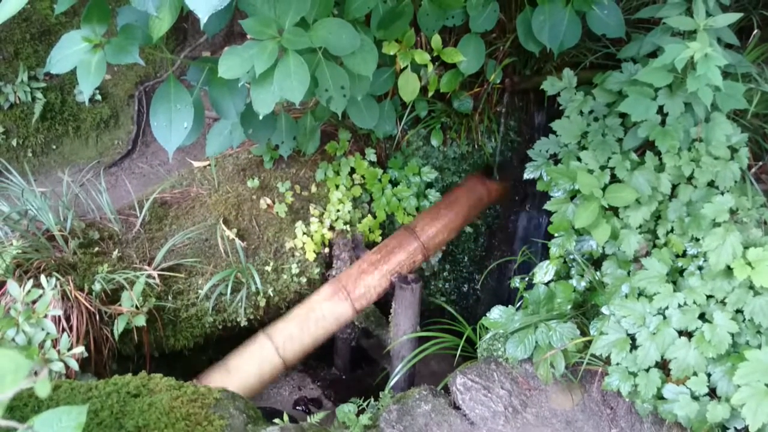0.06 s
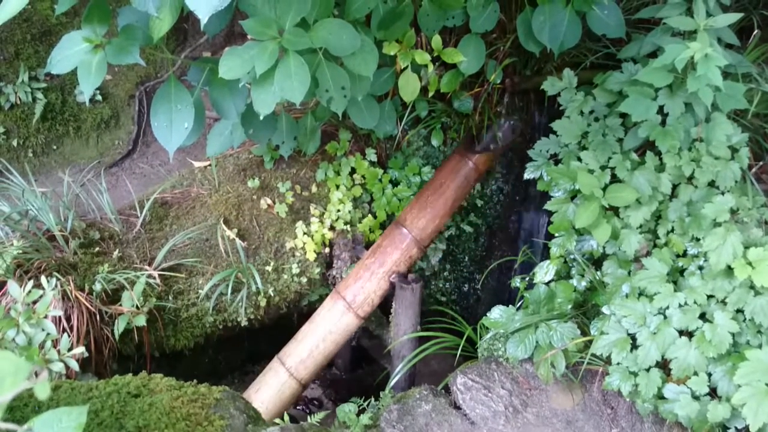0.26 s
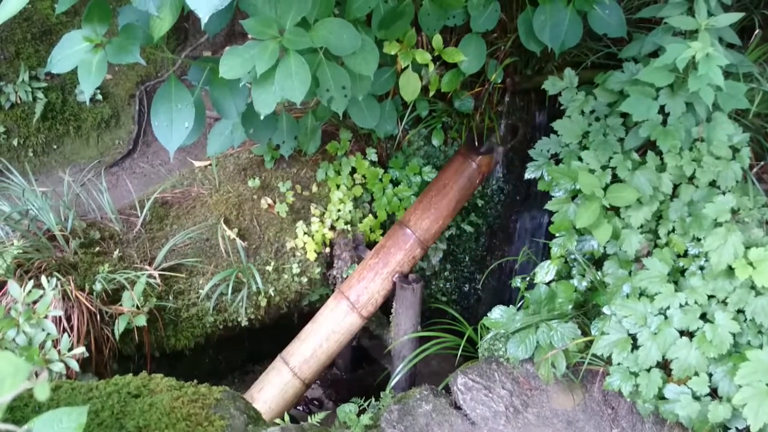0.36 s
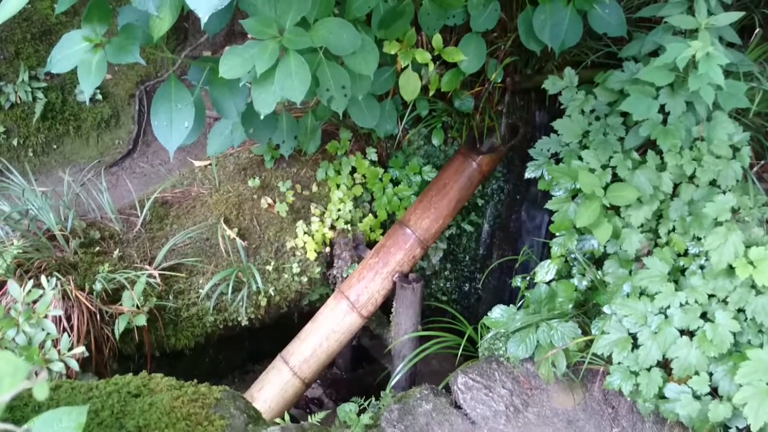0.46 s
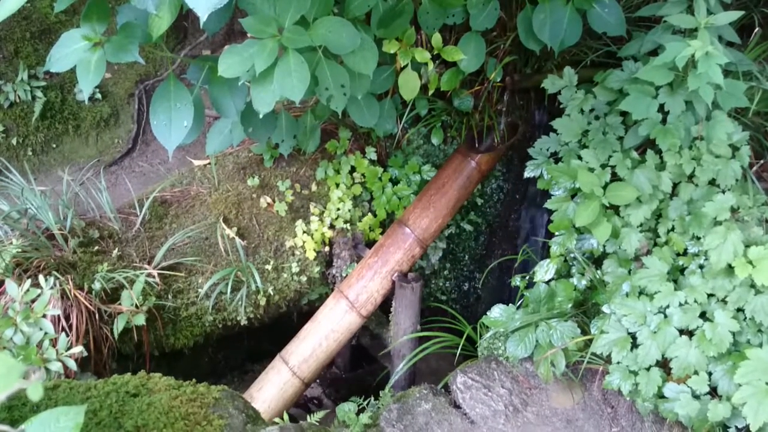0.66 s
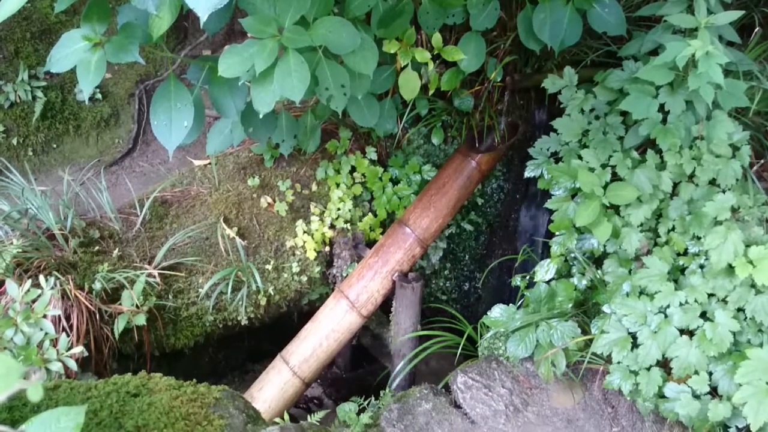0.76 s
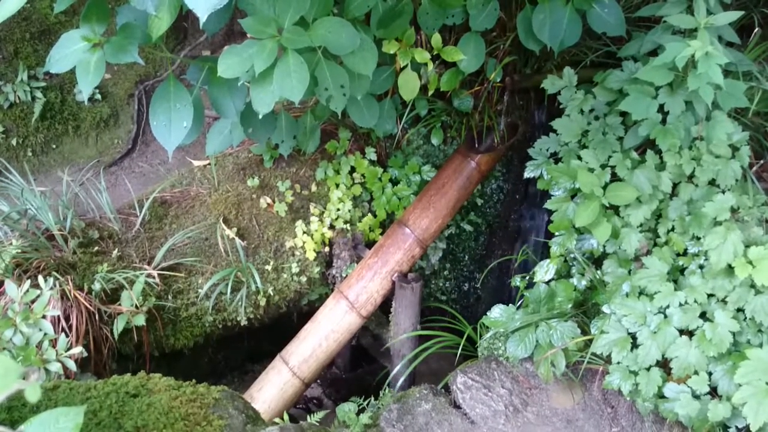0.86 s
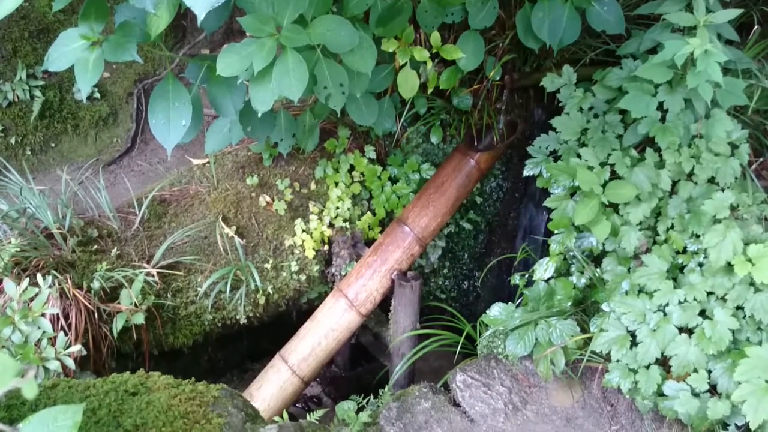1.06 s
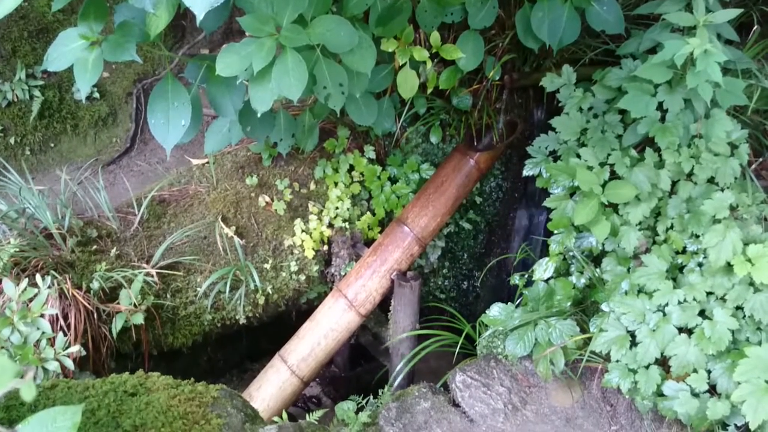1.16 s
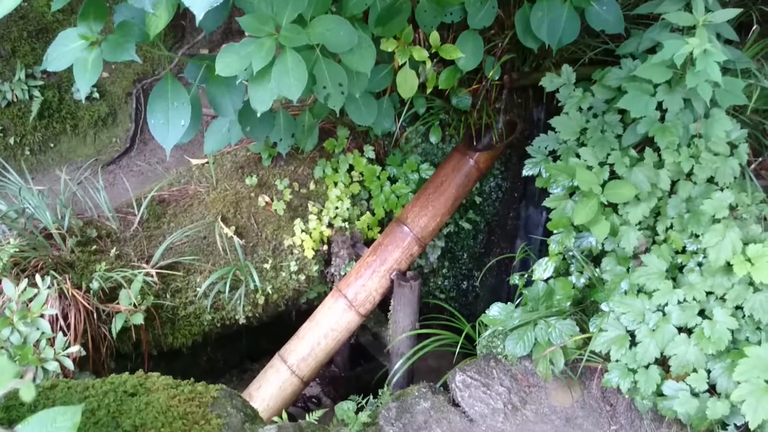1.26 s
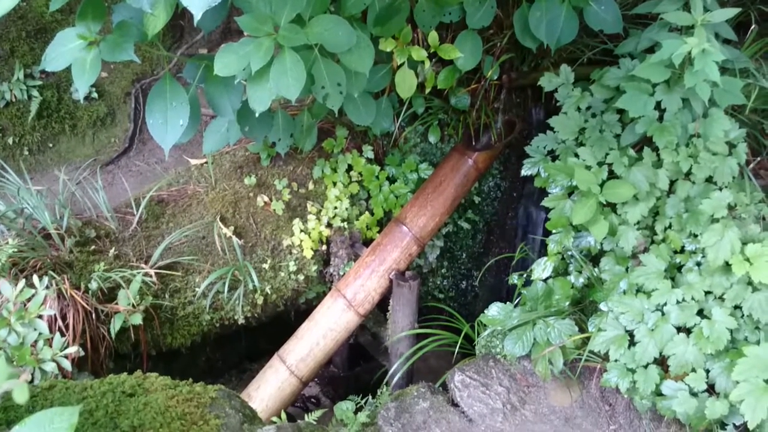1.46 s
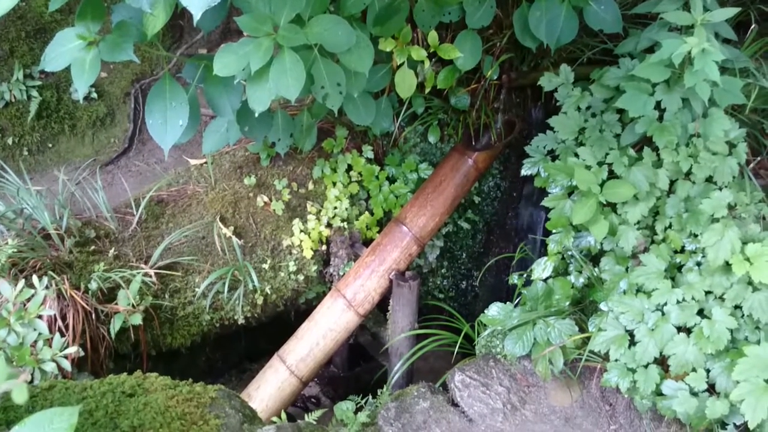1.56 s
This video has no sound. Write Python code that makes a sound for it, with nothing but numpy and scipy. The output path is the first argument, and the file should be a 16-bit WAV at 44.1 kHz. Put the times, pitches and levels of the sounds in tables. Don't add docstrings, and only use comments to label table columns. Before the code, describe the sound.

A hollow bamboo tube knocks loudly on stone, then clacks softly as thin water trickles behind

```python
import sys
import numpy as np
from scipy import signal
from scipy.fft import rfft, irfft
from scipy.io import wavfile
from scipy.ndimage import uniform_filter1d

SR = 44100
rng = np.random.default_rng(int(sys.argv[2]) if len(sys.argv) > 2 else 0)


def wrap_up_sound(samples):
    columns = np.atleast_2d(samples).T
    tamed = np.clip(columns, -1, 1)
    steps = np.round(tamed * 32767).astype(np.int16)
    wavfile.write(sys.argv[1], SR, steps)


def gain_from_db(level_db):
    decades = np.asarray(level_db, float) / 20
    return 10 ** decades


N = 70560


def evened(x):
    return x / np.sqrt(np.mean(x ** 2) + 1e-20)


def read(points, hz):
    f, value = np.transpose(points)
    return np.interp(np.log(hz + 1), np.log(f + 1), value)


def add(mix, start_s, sound):
    part = mix[..., round(start_s * SR):][..., :sound.shape[-1]]
    part += sound[..., :part.shape[-1]]


def colour(x, points):
    gain = gain_from_db(read(points, np.fft.rfftfreq(x.shape[-1], 1 / SR)))
    return irfft(rfft(x) * gain, x.shape[-1])


def patchy(shape, bands, frames):
    across = uniform_filter1d(rng.standard_normal(shape), size=bands, axis=0)
    return evened(uniform_filter1d(across, size=frames, axis=1))


# frequency_hz, level_db
PORT_BALANCE = [(200, -0.5), (800, -3), (1400, -9), (2800, -8.5), (4400, -11.5), (6200, 7.5), (8800, 9),
                (13000, -11)]
# frequency_hz, correlation
WATER_LIKENESS = [(60, -0.41), (700, -0.5), (1400, -0.17), (1800, -0.44), (2600, -0.022)]


def ports(pair, likeness=WATER_LIKENESS):
    hz = np.fft.rfftfreq(pair.shape[1], 1 / SR)
    first, second = rfft(pair)
    same = np.clip(read(likeness, hz), -1, 1)
    tilt = gain_from_db(read(PORT_BALANCE, hz))
    left = tilt * (same * first + np.sqrt(1 - same ** 2) * second)
    both = np.array([left, first]) * np.sqrt(2 / (1 + tilt ** 2))
    return irfft(both, pair.shape[1])


def struck(modes, level_db, contact_s):
    hardest = .33
    low_lag_rad, flip_hz, port_s = 2.79, 1420, .0008
    t = np.arange(SR // 2) / SR
    u = np.linspace(0, 1, max(round(contact_s * SR), 8))
    swell = np.sin(np.pi * u ** .6)
    out = np.zeros((2, len(t)))
    for hz, mode_db, t60_s, left_db in modes:
        chatter = evened(uniform_filter1d(rng.standard_normal(2000), size=90))[:len(u)]
        force = swell * np.exp(.5 * chatter + 2j * np.pi * hz * (u - hardest) * contact_s)
        ring = gain_from_db(mode_db - 60 * t / t60_s) * np.exp(2j * np.pi * hz * t)
        ring = signal.fftconvolve(ring, force)[:len(t)] / abs(force).sum()
        lag = low_lag_rad if hz < flip_hz else 2 * np.pi * (hz - flip_hz) * port_s
        left = gain_from_db(left_db) * (ring * np.exp(1j * lag)).imag
        out += np.array([left, ring.imag])
    return gain_from_db(level_db + 3.5) * out


def played(modes, blows):
    out = np.zeros((2, N))
    for start_s, level_db, contact_s in blows:
        add(out, start_s, struck(modes, level_db, contact_s))
    return out


# frequency_hz, level_db, t60_s, left_minus_right_db
TUBE_MODES = [(259, -41.5, 0.52, -7.5), (341, -28.5, 0.22, -5), (554, -26, 0.23, -5),
              (735.4, -3.5, 0.11, -5.5), (858.6, -3.5, 0.064, -21.5), (1027.6, -15, 0.069, -19),
              (1192, -15.5, 0.059, -1), (1266.3, -8.5, 0.08, -6), (1341, -13.5, 0.11, -26),
              (1474, -1.5, 0.045, -13), (1636, -29, 0.24, -18), (1991, -20, .1, -2),
              (2321, -17.5, 0.13, -25), (2600, -19.5, 0.072, -4)]
# start_s, level_db, contact_s
STONE_BLOWS = [
    (.2254, 0, .02),
]
# frequency_hz, level_db, t60_s, left_minus_right_db
END_MODES = [(116, -34.5, 0.097, -2.5), (330, -30, 0.016, -3), (800, -12, 0.012, 2),
             (1106, -18.5, .04, 3.5), (1475, -8.5, 0.018, -8), (2444, -18, 0.05, -12),
             (3032, -23.5, 0.052, 0.5), (4130, -19.5, 0.071, -12.5)]
# start_s, level_db, contact_s
FIRST_TOUCH = [
    (.2254, 0, .0015),
]


def knock():
    return played(TUBE_MODES, STONE_BLOWS) + played(END_MODES, FIRST_TOUCH)


# frequency_hz, level_db
CRACK_COLOUR = [(60, -50), (250, -28), (900, 0.5), (2000, -1), (4200, -8.5), (7000, -7), (10000, -14.5),
                (16000, -24.5)]
# frequency_hz, t60_s
CRACK_DECAY = [(100, 0.12), (1000, 0.11), (2500, 0.14), (4200, 0.12), (6000, 0.072), (14000, 0.043)]
# frequency_hz, correlation
CRACK_LIKENESS = [(300, 0.28), (1300, 0.42), (1750, -0.23), (2400, -0.26)]


def crack():
    crack_db, garden_db, garden_slower = -11, -19, 5.05
    noise = ports(rng.standard_normal((2, SR // 2)), CRACK_LIKENESS)
    hz, frame_s, z = signal.stft(noise, SR, nperseg=256, noverlap=192)
    fall_db = -60 * frame_s / read(CRACK_DECAY, hz)[:, None]
    decay = gain_from_db(fall_db) + gain_from_db(garden_db + fall_db / garden_slower)
    z = z * gain_from_db(read(CRACK_COLOUR, hz))[:, None] * decay
    z = z * gain_from_db(0.82 * patchy(z.shape[1:], 12, 3))
    x = signal.istft(z, SR, nperseg=256, noverlap=192)[1]
    t = np.arange(x.shape[1]) / SR
    level = gain_from_db(crack_db) / np.sqrt(np.mean(x[:, :400] ** 2))
    return level * x * np.minimum(t / 0.0013, 1) + tap(t)


def tap(t):
    level_db, hz, peak_s = -7, 950, .0008
    swell = (t / peak_s) ** 2 * np.exp(2 - 2 * t / peak_s)
    return gain_from_db(level_db) * np.sin(2 * np.pi * hz * t) * swell * np.array([[.8], [-1]])


# frequency_hz, level_db, t60_s, left_minus_right_db
SOFT_MODES = [(150, -15, .04, -4), (250, -12, .07, -5), (355, -19, .2, -6), (520, -18, .03, -6),
              (730, -2.5, .2, -7), (845, -3.5, .09, -9), (980, -7, .03, -9), (1370, -15, .05, -10)]
# start_s, level_db, contact_s
SOFT_BOUNCE = [
    (.5284, -35.5, .006),
]


def bounce():
    return played(SOFT_MODES, SOFT_BOUNCE)


# frequency_hz, level_db, t60_s, left_minus_right_db
HOLLOW_MODES = [(855, 0, .17, -11)]
# start_s, level_db, contact_s
HOLLOW_WAKE = (.309, -32, .01)


def hollow():
    return played(HOLLOW_MODES, [HOLLOW_WAKE])


# frequency_hz, level_db, t60_s, left_minus_right_db
PIVOT_MODES = [(94, -22, 0.11, -1), (136, -17, .06, -3.5), (857, -14, 0.12, -10), (1059, 0, 0.031, -10),
               (1173, -11, 0.075, -6.5), (1350, 5, 0.021, -17), (1600, -2.5, 0.025, -3),
               (1728, -8.5, 0.022, -18), (1978, -8.5, 0.048, -10), (2400, -3, 0.017, -10),
               (2530, -13.5, .04, -10.5), (2800, -10.5, 0.02, -14)]
# start_s, level_db, contact_s
PIVOT_CLACKS = [
    (.3037, -32, .002),
    (.3075, -26, .003),
    (.3113, -28, .002),
    (.3412, -24, .004),
    (.3454, -24, .002),
    (.3520, -31, .003),
    (.3570, -33, .0059),
    (.396, -46, .0017),
]


def pivot():
    return played(PIVOT_MODES, PIVOT_CLACKS)


# start_s, level_db, pitch_hz, t60_s
BUBBLE_EVENTS = [(0.059, -38.5, 2090, 0.024), (.573, -44, 1620, 0.033), (.641, -35.5, 7400, 0.0069),
                 (.69, -47, 3200, 0.016), (.72, -47, 1600, 0.049), (.786, -51.5, 1750, 0.072),
                 (.822, -41.5, 2220, 0.013), (0.901, -43.5, 2600, .025), (0.902, -53, 1680, 0.02),
                 (.904, -57, 860, 0.02), (0.928, -45, 1440, 0.015), (1.028, -46, 2600, 0.027),
                 (1.095, -50, 1452, 0.074), (1.145, -48.5, 1600, 0.027), (1.187, -43.5, 2490, 0.027),
                 (1.253, -46, 3030, 0.04), (1.271, -50, 1620, 0.025), (1.31, -52, 2470, 0.03),
                 (1.485, -44, 2300, 0.015), (0.579, -41, 1560, 0.018), (1.586, -54, 850, 0.07)]


def bubbles():
    rise = 0.049
    out, t = np.zeros((2, N)), np.arange(SR // 10) / SR
    for start_s, level_db, hz, t60_s in BUBBLE_EVENTS:
        turns = hz * t * (1 + rise * t / t60_s) + rng.random((2, 1))
        decay = gain_from_db(level_db + 6 - 60 * t / t60_s) * np.minimum(t / 0.0011, 1)
        add(out, start_s, decay * np.sin(2 * np.pi * turns))
    return ports(out)


# start_s, length_s, level_db, from_hz, to_hz, width_hz
JET_SONGS = [
    (.585, .024, -44, 3620, 3620, 30),
    (.612, .072, -53, 3600, 3640, 60),
    (.84, .15, -52, 3750, 4150, 200),
    (1.304, .03, -51, 2550, 2570, 60),
]


def singing_jet():
    out = np.zeros((2, N))
    for start_s, length_s, level_db, from_hz, to_hz, width_hz in JET_SONGS:
        u = np.linspace(0, 1, round(length_s * SR))
        pole = np.exp(-np.pi * width_hz / SR)
        noise = rng.standard_normal((2, 9000)) + 1j * rng.standard_normal((2, 9000))
        fuzz = signal.lfilter([1], [1, -pole], noise)[:, -len(u):]
        turn = np.exp(2j * np.pi * np.cumsum(from_hz + (to_hz - from_hz) * u) / SR)
        swell = np.sqrt(np.sin(np.pi * u).clip(0))
        add(out, start_s, gain_from_db(level_db) * evened((fuzz * turn).real) * swell)
    return ports(out)


# start_s, level_db, t60_s
SPLASH_EVENTS = [(0.029, -37.5, 0.13), (.06, -32.5, 0.025), (0.151, -43, 0.021), (0.637, -37, 0.045),
                 (.686, -37, 0.087), (0.902, -29, 0.041), (0.927, -37, 0.039), (1.054, -35, 0.02),
                 (1.242, -39, 0.094), (1.265, -36.5, 0.13), (1.299, -38, 0.21), (1.469, -64, 0.033)]


def splashes():
    out, t = np.zeros((2, N)), np.arange(SR // 10) / SR
    for start_s, level_db, t60_s in SPLASH_EVENTS:
        decay = gain_from_db(level_db - 60 * t / t60_s) * np.minimum(t / 0.00062, 1)
        add(out, start_s, decay * rng.standard_normal((2, len(t))))
    tone = [(700, -20), (2000, -5.5), (5000, -11.0), (8000, 1.0), (9500, -7.5), (14000, -14.5)]
    return ports(colour(out, tone))


def wash():
    z = signal.stft(rng.standard_normal((2, N)), SR, nperseg=512, noverlap=384)[2]
    patches = patchy(z.shape[1:], 6, 8)
    flicker = evened(uniform_filter1d(rng.standard_normal(z.shape[2]), size=4))
    z = z * gain_from_db(0.44 * patches + 0.81 * flicker)
    return evened(signal.istft(z, SR, nperseg=512, noverlap=384)[1][:, :N])


def fizz():
    per_s, grain_s = 1600, 0.013
    size = gain_from_db(1.17 * np.minimum(rng.exponential(1, N), 4)) * (rng.random(N) < per_s / SR)
    kind, out = rng.integers(0, 60, N), np.zeros((2, N))
    u = np.linspace(0, 1, round(SR * grain_s))
    swell = np.sin(np.pi * u ** .5) ** 2
    pitches = np.linspace(1300, 15800, num=60) + rng.uniform(-100, 150, size=60)
    for k, hz in enumerate(pitches):
        for side in (0, 1):
            turns = hz * grain_s * u * (1 + 0.021 * u) + rng.random()
            grain = np.sin(2 * np.pi * turns) * swell
            out[side] += signal.oaconvolve(size * (kind == k), grain)[:N]
    return evened(out)


# frequency_hz, level_db_per_hz
WATER_COLOUR = [(1230, -10.5), (1480, -2.5), (4200, -2.5), (5300, -7.5), (6700, -1.5), (9000, -8.5),
                (10000, -14), (16000, -16.5)]
# time_s, level_db
WATER_FLOW = [(0, -1), (.1, -2), (.2, -1.5), (.45, -1.5), (0.651, -1.5), (.74, -1.5), (.77, -3.5),
              (.88, -1), (1.0, -2.5), (1.2, -3), (1.26, -1), (1.33, -3), (1.37, -4.5), (1.47, -1),
              (1.6, -3.5)]


def trickle():
    water_db, fizz_db = -48.5, -5.5
    s, db = np.transpose(WATER_FLOW)
    flow = gain_from_db(np.interp(np.arange(N) / SR, s, db - db.mean()))
    shape = [(200, -52.5), (800, WATER_COLOUR[0][1] - 6)] + list(WATER_COLOUR)
    water = evened(colour(wash() + gain_from_db(fizz_db) * fizz(), shape))
    return ports(gain_from_db(water_db) * water * flow)


# frequency_hz, level_db_per_hz
HUM_COLOUR = [(15, -58), (25, -19), (32, -33), (64, -12.5), (433, -11.5), (868, -5), (1200, -12),
              (1560, -70.5), (2640, -120)]


def hum():
    shape = list(HUM_COLOUR) + [(2000, -79)]
    return ports(gain_from_db(-63) * evened(colour(rng.standard_normal((2, N)), shape)))


def scene():
    mix = trickle() + hum() + splashes()
    mix += bubbles() + singing_jet()
    mix += knock() + pivot()
    add(mix, STONE_BLOWS[0][0], crack())
    return mix + bounce() + hollow()


def top_cut(x):
    return signal.sosfilt(signal.butter(12, 16000, fs=SR, output="sos"), x)


def record(dry):
    ceiling, skew, knee = .88, .008, 4
    limit = ceiling - skew * np.sign(dry)
    x = dry / (1 + abs(dry / limit) ** knee) ** (1 / knee)
    low_cut = signal.butter(1, 55, "high", fs=SR, output="sos")
    x = signal.sosfilt(low_cut, x)
    band_edge = signal.firwin(1023, 15950, window=("kaiser", 9), fs=SR)
    x = signal.oaconvolve(x, band_edge[None], "same")
    return top_cut(x)


dry = scene()
out = record(dry)
wrap_up_sound(out)
```